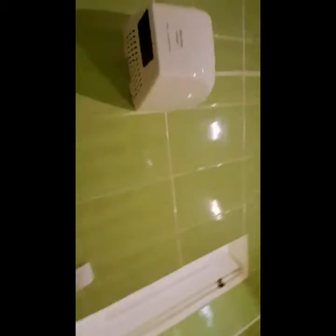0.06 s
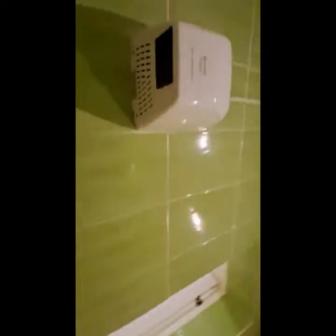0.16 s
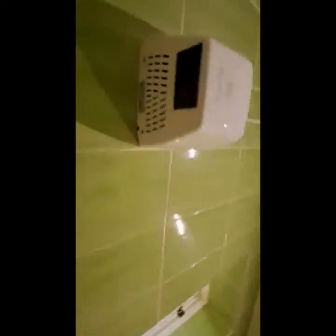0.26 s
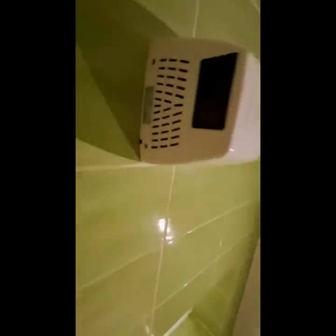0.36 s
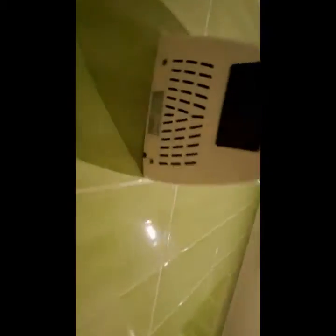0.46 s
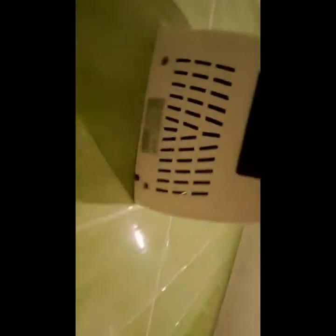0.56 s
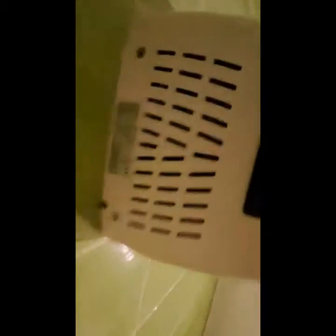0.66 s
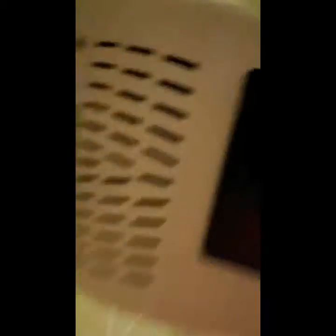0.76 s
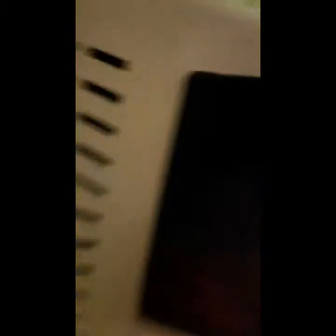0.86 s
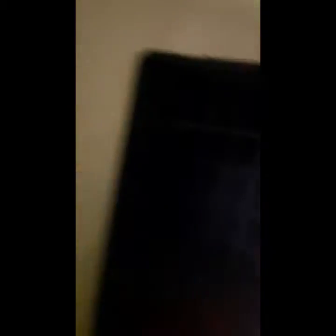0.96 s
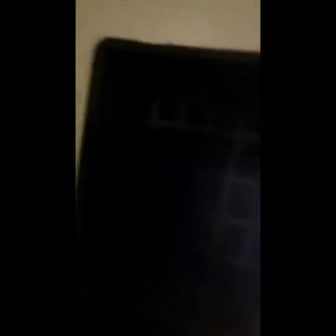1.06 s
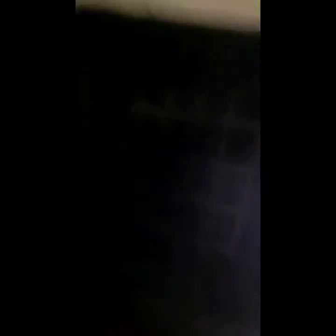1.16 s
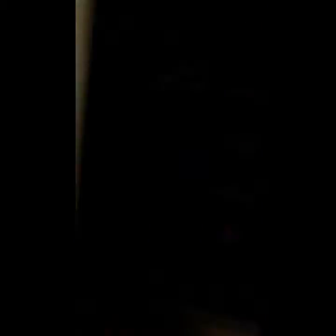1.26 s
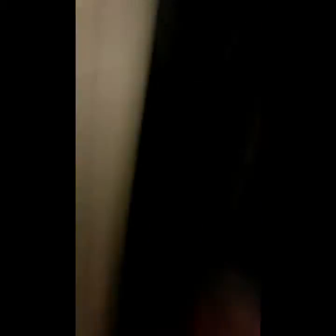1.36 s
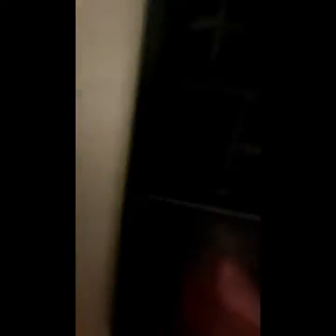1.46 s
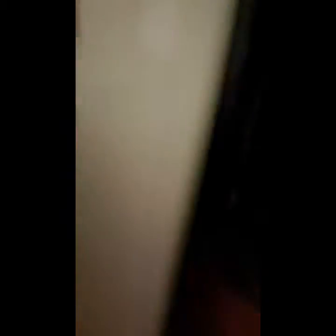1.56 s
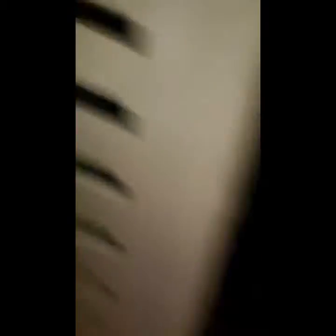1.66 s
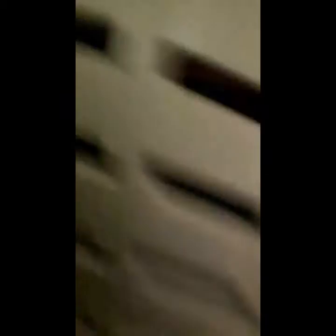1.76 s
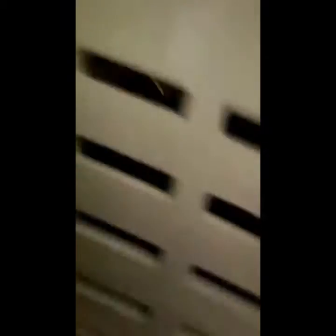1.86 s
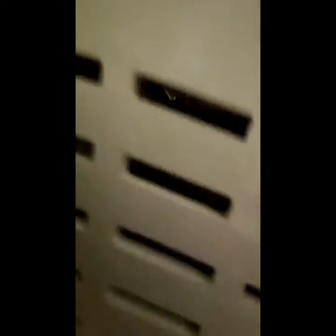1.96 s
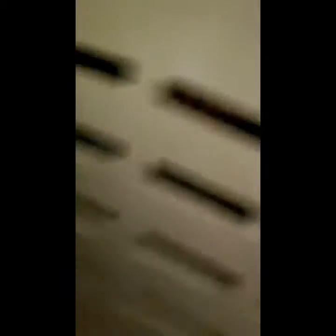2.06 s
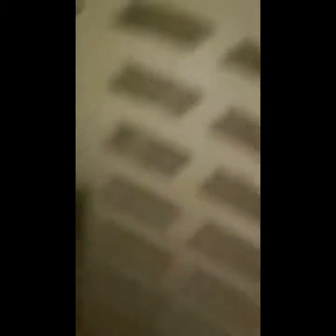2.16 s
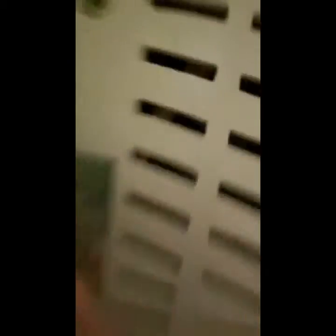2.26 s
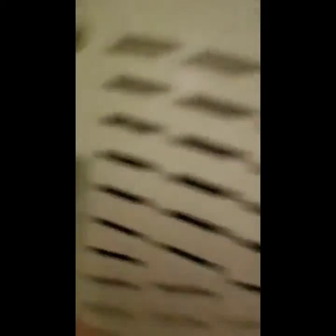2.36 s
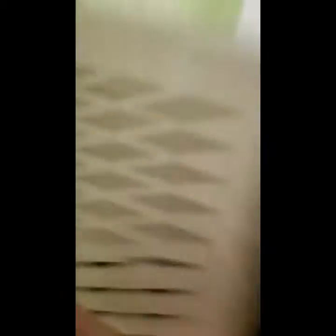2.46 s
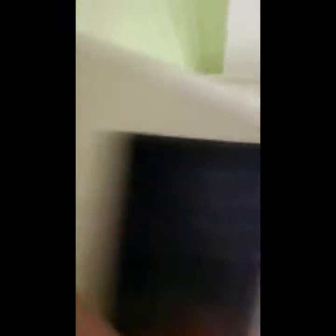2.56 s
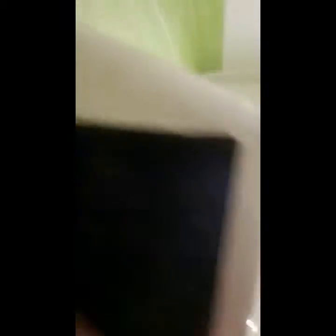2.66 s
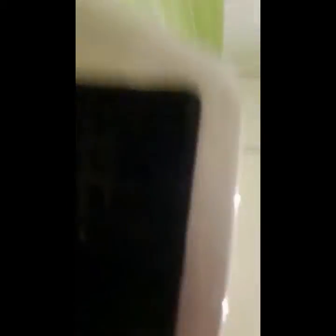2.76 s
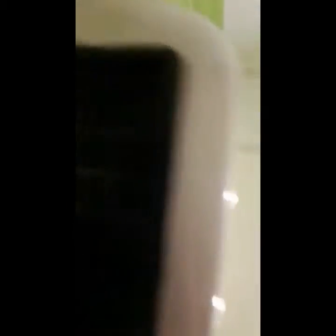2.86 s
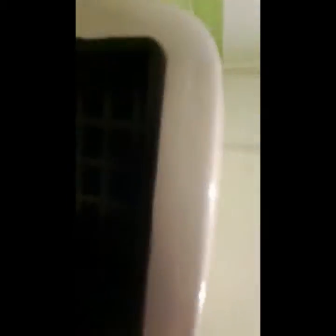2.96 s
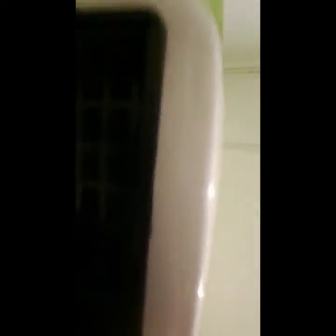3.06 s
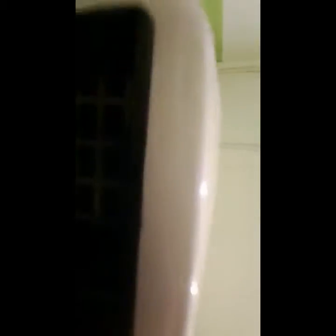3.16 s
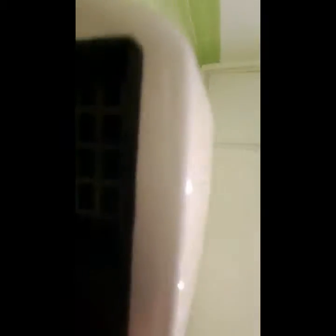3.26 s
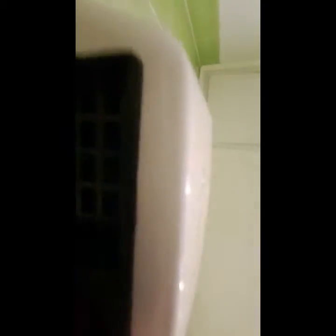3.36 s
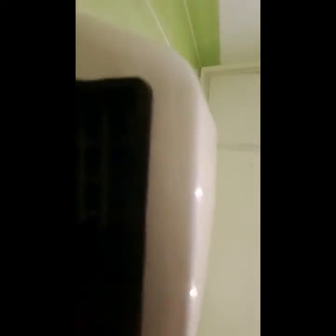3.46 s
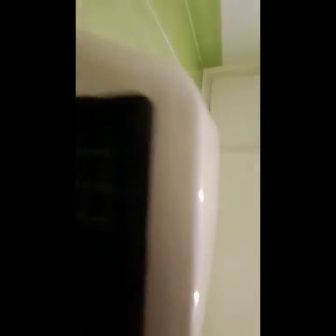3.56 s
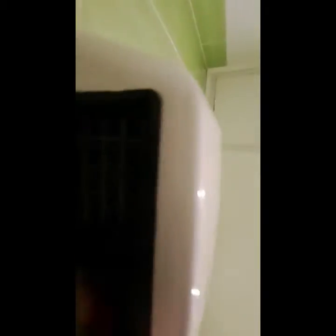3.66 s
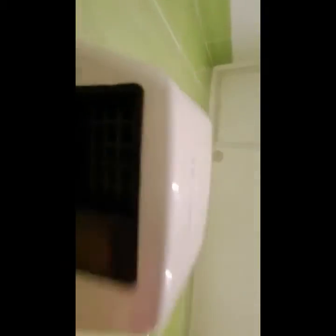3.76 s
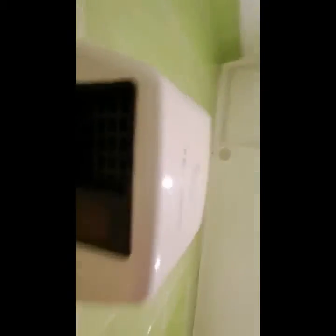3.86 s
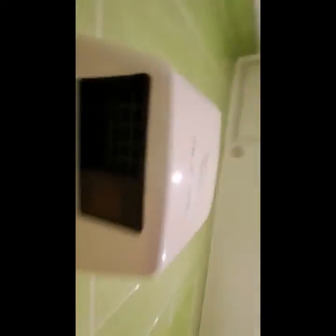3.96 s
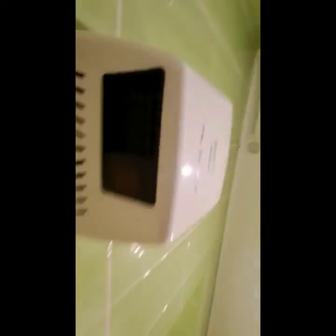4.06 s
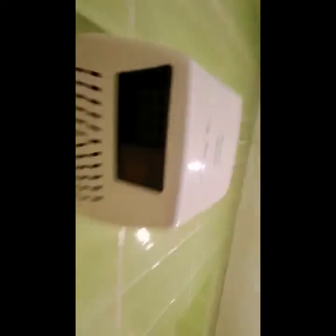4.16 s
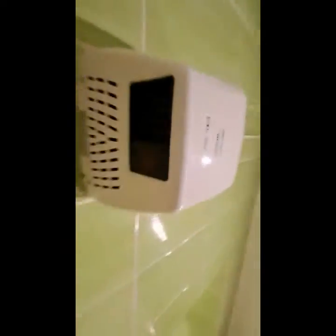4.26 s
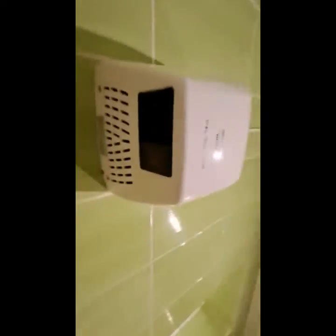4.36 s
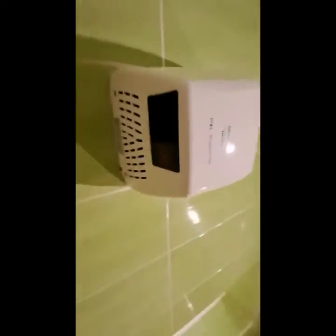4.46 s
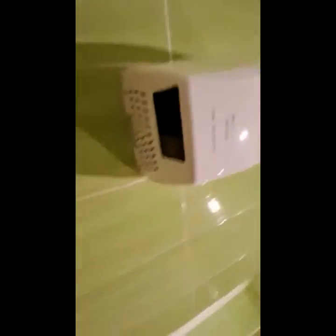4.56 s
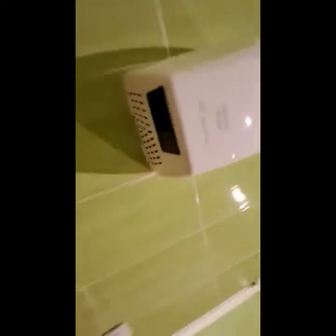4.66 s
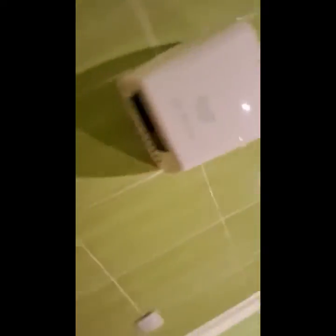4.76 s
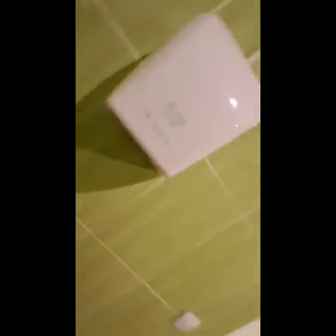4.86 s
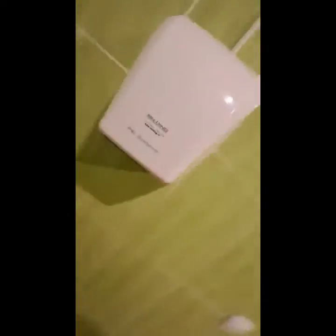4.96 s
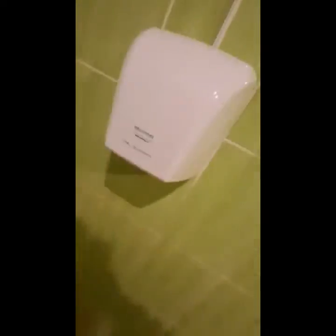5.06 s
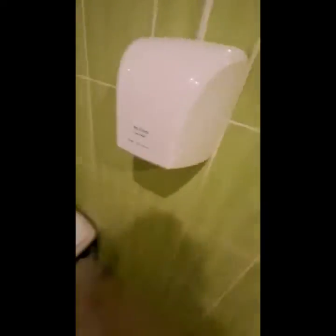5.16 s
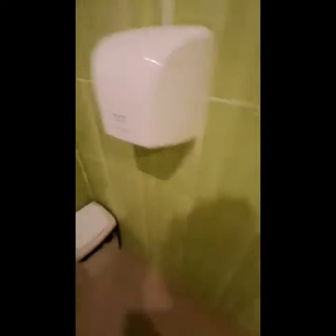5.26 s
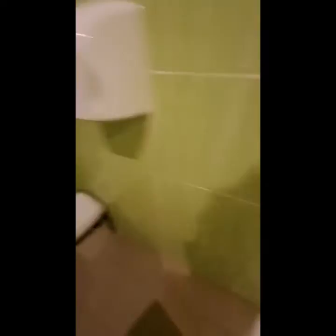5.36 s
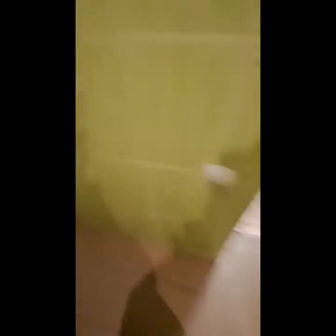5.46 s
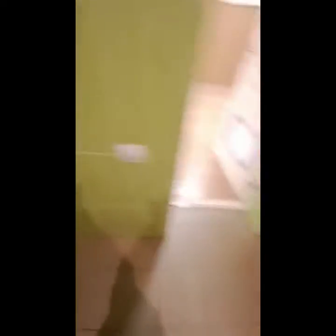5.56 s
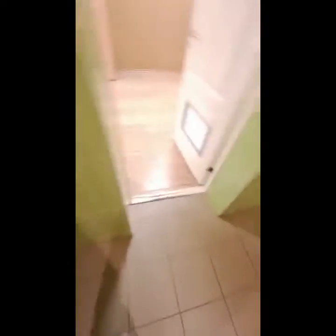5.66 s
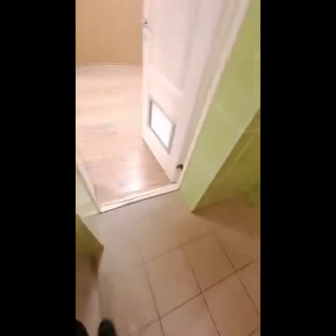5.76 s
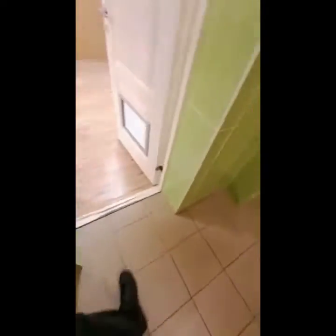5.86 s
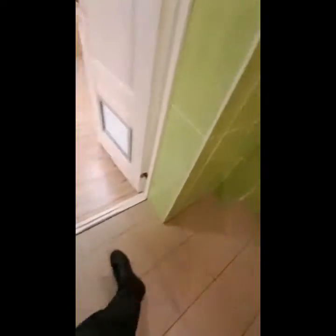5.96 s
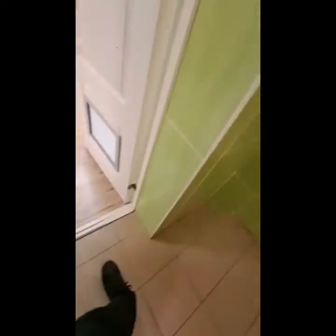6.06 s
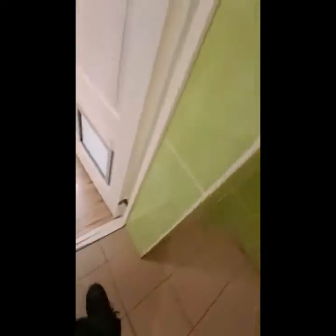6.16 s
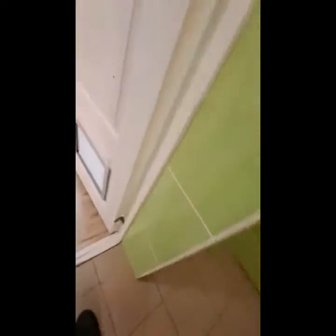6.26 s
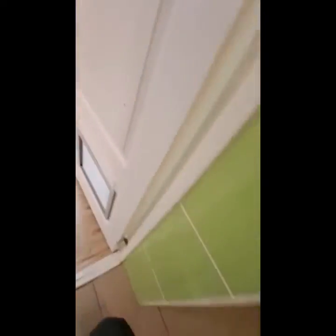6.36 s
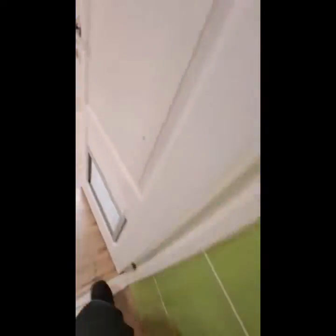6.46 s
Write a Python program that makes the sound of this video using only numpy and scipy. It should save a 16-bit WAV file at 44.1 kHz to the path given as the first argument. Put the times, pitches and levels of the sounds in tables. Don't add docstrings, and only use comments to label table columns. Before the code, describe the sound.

A close, handheld stereo microphone in a small, reverberant tiled washroom. From 0 s there is low room tone, clothing rustle and soft dull steps; at about 0.64 s a rubber sole squeaks roughly around 2.6 kHz, fading by 1 s. More muffled steps follow. Around 1.77-1.9 s a fingertip tap, heavy thuds and a firm knock hit the plastic housing; the hardest, bright knock comes at 2.24 s, a last tick at 2.42 s. Faint sole drags and a hollow heel thump at 3.16 s. At 3.49 s a relay snaps, the stalled motor buzzes at 100 Hz, and from 3.6 s air blasts and buffets the left side while the cover rattles until 3.85 s. The dryer then runs steadily: broad rushing air, low hum and a faint fluttering whine near 2.65 kHz. It dips around 5 s, swells around 5.5 s with light wind bumps, and recedes, still running, at 6.5 s.

```python
import sys
import numpy as np
from scipy import signal
from scipy.io import wavfile
from scipy.ndimage import uniform_filter1d

SR = 44100
rng = np.random.default_rng(int(sys.argv[2]) if len(sys.argv) > 2 else 0)


def bounce(signal):
    frames = np.transpose(np.atleast_2d(signal))
    limited = np.clip(frames, -1, 1)
    pcm = np.round(limited * 32767).astype(np.int16)
    wavfile.write(sys.argv[1], SR, pcm)


def voltage_ratio(decibels):
    exponent = np.asarray(decibels, float) / 20
    return 10 ** exponent


N = 287532
T = np.arange(N) / SR
START_S = 3.49


def evened(x):
    return x / np.sqrt(np.mean(x ** 2) + 1e-20)


def read(points, hz):
    f, value = np.transpose(points)
    return np.interp(np.log(hz + 1), np.log(f + 1), value)


def curves(rows, t=T):
    s, *columns = np.transpose(rows)
    return np.array([np.interp(t, s, c) for c in columns])


def add(mix, s, sound):
    part = mix[..., round(s * SR):][..., :sound.shape[-1]]
    part += sound[..., :part.shape[-1]]


def resonate(x, hz, width):
    return signal.lfilter(*signal.iirpeak(hz, hz / max(width, 2), SR), x)


def wander(width):
    smooth = uniform_filter1d(rng.standard_normal(N), int(width))
    return evened(uniform_filter1d(smooth, int(width)))


def swell(rows):
    return sum(voltage_ratio(db) * np.exp(-.5 * ((T - s) / length) ** 2) for s, db, length in rows)


def pan(db):
    return voltage_ratio(np.array([[.5], [-.5]]) * db)


def ports(x, pan_db=0, lag=14):
    return np.array([x, np.roll(x, lag)]) * pan(pan_db)


# low f/Hz, high f/Hz
BANDS = [(30, 200), (200, 1000), (1000, 5000), (5000, 15500)]


def layers(steady_db, bumps, narrow_db):
    centres = np.array([np.sqrt(lo * hi) for lo, hi in BANDS])[:, None]
    power = sum(voltage_ratio(2 * db) for db in steady_db)
    for s, db, length, hz in bumps:
        band_db = db - narrow_db * np.log2(centres / hz) ** 2
        power = power + voltage_ratio(2 * band_db) * np.exp(-((T - s) / length) ** 2)
    return 10 * np.log10(power)


# f/Hz, likeness/0-1
ALIKE = [(30, 0.7), (70, 1), (130, 0.98), (300, 0.89), (700, 0.98), (1500, 0.06), (4000, 0), (15000, 0)]
# f/Hz, width/Hz, level/dB
NOZZLE = [(712, 38, 14.5), (1190, 150, -6.5), (3490, 540, 8), (5000, 140, -5), (5960, 650, 6.5),
          (11300, 260, 5), (15000, 1300, -1)]
# f/Hz, level/dB
JET_SHIFT = [(60, -9), (150, 2.5), (280, -3), (600, 1), (1200, -1.7), (5000, 1), (12000, -1.7)]


def noise(spectrum, levels, patchy_db, flicker_db, jet=0, close=0, lag=14, size=1024):
    hop, hz = size // 4, np.fft.rfftfreq(size, 1 / SR)
    t = np.arange(N // hop + 5) * hop / SR
    a, b, c, d, patches = rng.standard_normal((len(t), len(hz), 5)).T
    patches = uniform_filter1d(patches, size=10, axis=0)
    patches = evened(uniform_filter1d(patches, size=12, axis=1))
    jet = np.clip(np.interp(t, T, jet * np.ones(N)), 0, 1)
    close = np.interp(t, T, close * np.ones(N))

    shape = read(spectrum, hz)
    own_db = []
    for lo, hi in BANDS:
        own_db.append(10 * np.log10(np.sum(voltage_ratio(2 * shape)[(hz > lo) & (hz <= hi)]) / len(hz)))
    lift = np.array([np.interp(t, T, db) for db in levels]) - np.array(own_db)[:, None]
    centres = np.log([np.sqrt(lo * hi) for lo, hi in BANDS])
    blend = np.array([np.interp(np.log(hz + 1), centres, row) for row in np.eye(len(BANDS))]).T
    field_db = shape[:, None] + blend @ lift + patchy_db * patches + flicker_db * rng.standard_normal(len(t))
    humps_db = sum(db * np.exp(-.5 * ((hz - f) / width) ** 2) for f, width, db in NOZZLE)
    field_db = field_db + np.outer(read(JET_SHIFT, hz), jet) + np.outer(humps_db, close)

    same = np.clip(read(ALIKE, hz)[:, None] * (1 - jet), 0, 1)
    left = a + 1j * b
    delayed = left * np.exp(-2j * np.pi * hz[:, None] * lag / SR)
    right = same * delayed + np.sqrt(1 - same ** 2) * (c + 1j * d)
    tilt_db = jet * np.interp(hz, [100, 260, 600, 3000, 9000], [-14.0, 11.5, 18.5, 10.0, 4.5])[:, None]
    z = np.array([left * voltage_ratio(0.33 * tilt_db), right * voltage_ratio(-.7 * tilt_db)]) * voltage_ratio(field_db)
    unit = np.std(signal.istft(left, nperseg=size, noverlap=size - hop)[1])
    return 1.091 * signal.istft(z, nperseg=size, noverlap=size - hop)[1][:, :N] / unit


# f/Hz, t60/s
TILES = [(120, 1.0), (330, .8), (900, .6), (2500, .72), (5200, .42), (10000, .3)]


def room(x, gap=120):
    taps = np.zeros((2, SR))
    at = np.arange(gap, SR - 40, 20) + rng.integers(0, 20, (2, 1))
    at = at + rng.integers(0, 20, at.shape)
    np.put_along_axis(taps, at, rng.choice([-1., 1.], at.shape), axis=1)
    hz, t, z = signal.stft(taps, SR, nperseg=256)
    bass = np.clip(read(ALIKE, hz), 0, 1)[:, None] ** 2
    z[1] = bass * z[0] + np.sqrt(1 - bass ** 2) * z[1]
    t60 = np.clip(read(TILES, hz), .15, 1.5)[:, None]
    tail = signal.istft(z * voltage_ratio(-60 * t / t60), SR, nperseg=256)[1]
    return signal.fftconvolve(x[None], tail / np.linalg.norm(tail[0]), axes=1)[:, :N]


# f/Hz, level per Hz/dB
QUIET = [(25, 10), (50, -1), (87, -2), (123, -20), (161, 1), (200, -3.5), (476, -3.5), (800, -15.5),
         (1500, -27.5), (2500, -34.5), (4500, -35), (8000, -39), (12500, -42), (16000, -43)]
# f/Hz, width/Hz, level/dB
BOOM = [
    (89.2, 17, -4.5),
    (159, 2.4, 2),
    (245, 6.6, -10),
    (344, 28, -16.5),
    (456, 15, -16),
]
TONE_DB = [-51.5, -66, -79, -74]
# t/s, level/dB
RUSTLE = [(0.0, -56.5), (0.13, -50), (0.27, -46.5), (0.56, -50.5), (0.72, -45.5), (0.98, -51), (1.23, -53),
          (1.45, -53.5), (1.71, -51), (1.81, -47), (1.95, -47), (2.15, -57.5), (2.28, -46.5), (2.45, -54),
          (2.6, -65.5), (2.78, -55.5), (3.28, -53.5), (3.5, -61)]
RUSTLE_DB = [-7, -10.5, -0.5, -8]
RUSTLE_FOLLOW = [1, 0.88, 0.93, 1.4]
RUSTLE_MID_DB = -50
# t/s, level/dB, length/s, centre f/Hz
SWAYS = [(0.195, -45.5, 0.092, 500), (.172, -47, .02, 1000), (.76, -50.5, 0.067, 500),
         (0.666, -51, 0.12, 450), (0.144, -45.5, 0.058, 90), (0.2, -59, 0.11, 8000), (0.54, -44, 0.11, 60),
         (0.834, -46, 0.037, 90), (1.21, -47, 0.063, 110), (1.25, -53, 0.057, 8000),
         (1.745, -37, 0.079, 50), (1.886, -45, 0.092, 110), (2.053, -44, 0.084, 404),
         (2.093, -68, 0.03, 6950), (2.304, -35, 0.066, 200), (2.397, -49, 0.14, 246),
         (2.733, -63.5, 0.029, 9100), (2.916, -60, 0.026, 8950), (3.298, -48, 0.072, 68),
         (3.497, -44, 0.026, 60)]


def stir():
    swing_db = np.c_[RUSTLE_FOLLOW] * (curves(RUSTLE) - RUSTLE_MID_DB)
    steady_db = [np.c_[TONE_DB], np.c_[RUSTLE_DB] + RUSTLE_MID_DB + swing_db]
    tone = noise(QUIET, layers(steady_db, SWAYS, narrow_db=2.5), patchy_db=.8, flicker_db=1.4)
    return 0.47 * tone + sum(2.46 * voltage_ratio(db) * resonate(tone, hz, width) for hz, width, db in BOOM)


# t/s, level/dB, length/s
WIND = [
    (1.72, -63, 0.096),
    (2.26, -37, 0.026),
    (3.601, -24.5, 0.037),
    (3.76, -36, 0.08),
    (3.924, -38.5, 0.083),
    (5.43, -44, 0.085),
    (5.55, -40.5, 0.11),
    (5.884, -45, 0.046),
    (6.285, -42, 0.07),
    (6.47, -35, 0.074),
]


def wind():
    lumps = resonate(resonate(rng.standard_normal((2, N)), 55, 65), 55, 110)
    return swell(WIND) * evened(lumps) * pan(-8)


# t/s, level/dB, length/s
DRAGS = [
    (2.79, -58, 0.034),
    (2.86, -61, 0.028),
    (2.97, -63, 0.017),
]


def drags():
    rub = resonate(resonate(rng.standard_normal((2, N)), 2150, 1900), 2150, 2800)
    return swell(DRAGS) * evened(rub)


# t/s, level/dB
THUMPS = [
    (3.025, -49),
    (3.157, -30.5),
]
# f/Hz, level/dB, t60/s
WALL_MODES = [(81, -4, 5.0), (156, -2.5, 1.3), (275, 0.5, 1.0), (343, -6, 0.86), (432, -6, 0.88),
              (660, -17.5, 0.52), (880, -14.5, 0.32)]


def thumps():
    out, t = np.zeros(N), np.arange(20000) / SR
    for (s, db), phase in zip(THUMPS, rng.random((len(THUMPS), len(WALL_MODES)))):
        ring = 0
        for (f, mode_db, t60), p in zip(WALL_MODES, phase):
            ring = ring + voltage_ratio(mode_db - 60 * t / np.clip(t60, .1, .45)) * np.sin(2 * np.pi * (f * t + p))
        ring *= 1 - np.exp(-t / 0.034)
        add(out, s, voltage_ratio(db) * ring / abs(ring).max())
    return ports(out, pan_db=1)


# t/s, thud level/dB, scrape level re thud/dB, thud f/Hz, length/s
STEPS = [(0.161, -34.5, -25, 503, 0.025), (0.606, -33.5, -9, 363, 0.038), (0.761, -44, -26, 430, 0.062),
         (1.154, -37, -42, 170, 0.027), (1.236, -40, -3, 283, 0.02), (1.404, -48, -18, 487, 0.081),
         (1.477, -40.5, -11, 170, 0.037), (1.772, -19.5, -20, 310, 0.017), (1.812, -22, -21, 270, 0.01),
         (2.037, -40, 4, 156, 0.062), (2.758, -59, -5, 153, 0.041), (2.882, -57, 6.5, 146, 0.11),
         (3.021, -41, -25, 159, 0.027), (3.159, -41, -40, 376, 0.063), (3.181, -34, -35, 245, 0.027),
         (3.226, -38, -18, 275, 0.032)]


def steps():
    out, t = np.zeros((2, N)), np.arange(12000) / SR
    for (s, db, scrape_db, hz, length), z in zip(STEPS, rng.standard_normal((len(STEPS), 2, 12000))):
        decay = np.exp(-t / np.clip(length, .005, .1)) + 0.33 * np.exp(-t / 0.0019)
        shape = (1 - np.exp(-t / 0.0049)) * decay
        thud = evened(resonate(resonate(z + 3.4 * z[0], hz, 170), hz, 420))
        thud += 0.19 * evened(resonate(resonate(z, 830, 700), 900, 900))
        scrape = evened(resonate(resonate(z, 1400, 4800), 2700, 12000))
        add(out, s, voltage_ratio(db) * shape * (thud + voltage_ratio(scrape_db) * scrape))
    return out


# t/s, level/dB, length/s
SLIPS = [
    (.6395, -26.5, .0026),
    (.6455, -29, .003),
    (.654, -29.5, .0035),
         (0.666, -40, 0.0027),
    (0.682, -36.5, 0.006),
    (0.709, -36.5, 0.0077),
    (.745, -39, 0.009),
    (0.773, -49, 0.011),
    (0.809, -46, 0.011),
    (0.859, -51, 0.0043),
    (0.932, -56.5, 0.011),
    (1.007, -58, 0.0067),
]
# t/s, f/Hz
SLIP = [(.635, 2640), (.65, 2560), (.66, 2520), (.69, 2620), (.715, 2520), (.745, 2600), (.78, 2540),
        (.81, 2620), (.86, 2560)]
# pitch ratio, level/dB
TREADS = [
    (1, 0),
    (1.07, -7),
    (1.17, -17),
    (.9, -19),
]


def squeak():
    turns = 2 * np.pi * np.cumsum(curves(SLIP)[0] * (1 + .03 * wander(22))) / SR
    level = swell(SLIPS)
    ribs = sum(voltage_ratio(db) * np.sin(ratio * turns) for ratio, db in TREADS)
    octave = (0.054 + 3.1 * level) * np.sin(2 * turns)
    return level * voltage_ratio(1.5 * wander(70)) * (ribs + octave)


def crack(z, modes, bright_db, rattle, rattle_s):
    t = np.arange(1000) / SR
    hit = np.pad(z * rattle * np.exp(-t[:400] / rattle_s), [(0, 0), (0, 600)]) + np.exp(-t / .00003)
    out = 0
    for k, (hz, width, db) in enumerate(modes):
        ring = evened(resonate(resonate(hit, hz, 1.62 * width), hz, 1.62 * width))
        mode_db = db + bright_db * np.clip(np.log2(hz / 2500), 0, 1.5)
        out = out + voltage_ratio(mode_db) * (-1) ** k * ring
    return out / abs(out).max()


# t/s, level/dB, brightness per octave/dB
SLAPS = [(.6045, -46, -14), (1.8935, -27, -1), (1.899, -33, -12), (2.039, -43, -4), (3.159, -47, -8),
         (3.526, -28, -2), (3.550, -20.5, -6), (3.5925, -13, -6), (3.606, -17, -7), (3.6635, -31, -6),
         (3.713, -24, 3.5), (3.617, -24, -3), (3.6854, -26, 6), (3.749, -29, 4), (3.8431, -23, -8)]
# f/Hz, width/Hz, level/dB
SHELL = [(1060, 118, 0), (1594, 280, -4), (2215, 300, -2), (3170, 510, -3.5), (4700, 660, -10.5),
         (5530, 250, -21.5), (7370, 860, -4.5), (10200, 1100, -11.5), (12700, 1900, -11)]


def slaps():
    out = np.zeros((2, N))
    for (s, db, bright_db), z in zip(SLAPS, rng.standard_normal((len(SLAPS), 2, 400))):
        add(out, s, 1.3 * voltage_ratio(db) * crack(z, SHELL, bright_db, rattle=0.32, rattle_s=0.0017))
    return out


# t/s, tick level/dB, ring re tick/dB, brightness per octave/dB, left-right/dB
KNOCKS = [
    (1.8877, -19.5, -4.5, -5.5, -5),
    (1.914, -30, -17.5, -17, 2),
    (2.206, -45.5, 7, 2, -4.5),
    (2.216, -35.5, -26, -4, -6),
    (2.2397, -11.5, -4.5, 2.5, -4.5),
    (2.25, -26, 6, -20, 6),
    (2.4166, -31.5, -3.5, -9.5, -4.5),
]
TAP = [
    (1.7706, -33, -8, -5, 2),
]
RELAY = [
    (3.4901, -19.5, -20, 0.0044, 6.5),
    (3.493, -20.5, -5.5, 0, 2),
]
# f/Hz, width/Hz, level/dB
PANEL = [(1070, 63, -11), (1670, 60, -4), (2110, 120, -1.5), (2750, 90, -10.5), (3800, 260, -10),
         (5100, 200, -16.5), (7900, 600, -14)]
# f/Hz, width/Hz, level/dB
CONTACT = [(1260, 75, -4), (2200, 330, -1), (3970, 430, -11.5), (5800, 610, -10), (7800, 850, -4),
           (9750, 400, -4), (12300, 600, -5), (14800, 900, -12)]
# f/Hz, level/dB, t60/s
FLANK = [(100, -6.5, 0.11), (245, 1, 0.11), (300, -7, .1), (356, -8, 0.18), (546, -11.5, 0.092),
         (660, -6.5, 0.14), (904, -18.5, .1), (1100, -12, .07)]
# f/Hz, level/dB, t60/s
HOUSING = [(160.5, -15.5, 0.24), (218.5, -8, 0.2), (261, -0.5, 0.16), (366.8, -4, 0.3), (420, -2.5, 0.07),
           (489, -3, 0.11), (569, -9, 0.21), (700, -8.5, 0.054)]


def knocks():
    out, t = np.zeros((2, N)), np.arange(12000) / SR
    rows = [(k, PANEL, .3, 0.0092) for k in TAP]  # blow, panels, rattle, rattle length in s
    rows += [(k, SHELL, .025, 0.0092) for k in KNOCKS]
    rows += [(k, CONTACT, .9, 0.0041) for k in RELAY]
    bloom = 1 + 1.1 * t / 0.029 * np.exp(1 - t / 0.029)
    chance = rng.standard_normal((len(rows), 2, 400 + len(HOUSING)))
    for ((s, db, ring_db, bright_db, pan_db), panels, rattle, rattle_s), z in zip(rows, chance):
        ring = 0
        for (f, mode_db, t60), u, v in zip(FLANK if s < 2 else HOUSING, *z[:, 400:]):
            twin = 0.82 * np.sin(2 * np.pi * f * 1.06 * t + 3 * v)
            decay = voltage_ratio(mode_db + 2.5 * u - 60 * t / np.clip(t60, .03, .3))
            ring = ring + decay * (np.sin(2 * np.pi * f * t) + twin)
        ring *= (1 - np.exp(-t / 0.00038)) * bloom
        sound = ports(voltage_ratio(ring_db + 3.0) * ring / abs(ring).max())
        add(sound, 0, 1.85 * crack(z[:, :400], panels, bright_db, rattle, rattle_s))
        add(out, s, sound * voltage_ratio(db) * pan(pan_db))
    return out


# t/s, level/dB, facing the nozzle/0-1
RUSH = [(3.49, -45, 1), (3.56, -32.5, 1), (3.62, -30.5, 1), (3.8, -27.5, 0.34), (4.0, -28.5, 0.77),
        (4.32, -30.5, 0.73), (4.91, -35.5, 0.55), (5.22, -34.5, 0.51), (5.43, -28.5, 0.6), (5.57, -28, 0.4),
        (5.82, -28, 0.16), (6.0, -29.5, 0.47), (6.24, -33, 0.38), (6.52, -35, 0.15)]
# t/s, turns f/Hz
SHAFT = [(3.49, 5), (3.6, 55), (3.7, 90), (3.8, 103), (3.9, 107), (4.1, 109.7), (4.2, 110.5), (4.4, 111),
         (6.52, 111.3)]
# multiple of the shaft, level/dB
ORDERS_DB = [
    (1, 0),
    (2, -8),
    (3, -14),
    (4, -41),
]
# t/s, shaft level/dB, mains level/dB, beating pair an octave up level/dB
HUM = [(3.9, -64, -52, -55), (4.1, -53.5, -67, -48), (4.3, -52, -59, -43.5), (4.6, -46, -63, -49.5),
       (4.9, -42.5, -71, -60), (5.2, -38.5, -68, -67), (5.45, -34.5, -65, -43), (5.6, -35, -57, -39),
       (5.8, -34.5, -47, -35.5), (6.0, -37, -46.5, -37.5), (6.2, -38, -44.5, -38), (6.52, -43, -44, -44)]
# multiple of 100 Hz, running level/dB, stalled level/dB
MAINS = [
    (1, 9.5, 8.5),
    (2, 0.5, 4),
    (3, -35, -1),
    (4, -18, -3),
    (5, -32, -14),
]
# t/s, level/dB, length/s
SPOTS = [(4.04, -3, 0.036), (4.12, 0.5, 0.081), (4.24, 1.5, 0.055), (4.4, 1, 0.077), (4.52, -9, .03),
         (4.65, -3.5, 0.091), (4.8, 4, 0.04), (4.885, 2, 0.009), (5.0, 5, 0.0088), (5.1, 5, 0.0063),
         (5.18, 6, 0.032), (5.27, -4, 0.019), (5.34, 0, .022), (5.45, 3, 0.011), (5.525, 8.5, 0.011),
         (5.6, -9, 0.013), (5.69, 4, 0.014), (5.78, 11, 0.023), (5.86, -11, .015), (5.95, 1, 0.026),
         (6.03, -1, 0.043), (6.15, 11.5, 0.0056), (6.21, 4, 0.0057), (6.33, -6, 0.032), (6.42, 2, 0.028)]


def motor():
    blade_count = 24
    shaft_db, mains_db, pair_db = curves(HUM)
    turns = 2 * np.pi * np.cumsum(curves(SHAFT)[0] * (1 + .0012 * wander(2500))) / SR
    cycles = 2 * np.pi * 100 * T
    shaft = sum(voltage_ratio(db + 0.25 * wander(1200)) * np.sin(k * turns + k) for k, db in ORDERS_DB)

    since = np.maximum(T - START_S, 0)
    release = 1 + np.exp(np.minimum((since - 0.1) / 0.016, 50))
    inrush = np.minimum(since / 0.059, 1) / release
    mains = 0
    for k, db, stall_db in MAINS:
        level = voltage_ratio(mains_db + db) + voltage_ratio(-26.5 + stall_db) * inrush
        mains = mains + level * voltage_ratio(1.6 * wander(920)) * np.cos(k * cycles + 0.87 * k * k)
    pair = voltage_ratio(pair_db) * (np.cos(2 * cycles) + 0.78 * np.cos(cycles + turns + 1.9))

    echo = voltage_ratio(-21.5) + swell(SPOTS)
    blade_level = echo * voltage_ratio(curves(RUSH)[0] - 6.5 + 1.7 * wander(430))
    blades = blade_level * np.sin(blade_count * turns + .65 * wander(610))
    blades = blades * np.clip((T - 3.93) / .13, 0, 1)
    hum = ports(voltage_ratio(shaft_db) * shaft, pan_db=1.5, lag=21) + ports(mains + pair, lag=16)
    return np.sqrt(2) * (hum + ports(blades))


# f/Hz, level per Hz/dB
AIR = [(25, -56), (60, -52), (140, -25.5), (300, -5), (520, -8.5), (820, -6.5), (1250, -8), (2000, -9.5),
       (2600, -12), (4600, -20), (6000, -23), (8500, -25), (12000, -24.5), (16000, -33)]
# t/s, share/0-1
JET = [
    (3.5, 0),
    (3.57, 0.04),
    (3.61, 1),
    (3.68, 1),
    (3.8, 1),
    (3.85, 0.59),
    (3.97, 0.19),
    (4.5, 0),
]
# t/s, closeness/0-1
CLOSE = [(3.8, 0.09), (4.05, 0.53), (4.5, 0.55), (5.0, 0.27), (5.4, 0.02), (6.0, 0.13), (6.5, 0.05)]
AWAY_DB = [-21.5, 2, 1, -8]
FACING_DB = [12.5, -15, -2, 1]
# t/s, level/dB, length/s, centre f/Hz
GUSTS = [(3.496, -19.5, 0.0082, 6660), (3.516, -13.5, 0.021, 258), (3.556, -32, 0.011, 395),
         (3.589, -11, 0.01, 438), (3.614, -10.5, 0.0085, 770), (3.637, -16.5, 0.017, 610),
         (3.679, -12.5, 0.0094, 650), (3.505, -20, .006, 300), (3.695, -15, 0.0069, 650),
         (3.714, -15, 0.022, 590), (3.61, -33.5, 0.0093, 4500), (3.74, -33, 0.04, 4500),
         (3.804, -21, 0.0059, 604), (4.007, -39, 0.15, 11200), (5.8, -36, 0.21, 11000),
         (3.752, -15.5, 0.023, 1030), (3.817, -27, 0.014, 700), (3.88, -44, 0.03, 596),
         (5.603, -25.5, 0.012, 700), (5.706, -24.5, 0.034, 603), (5.79, -41, 0.019, 700),
         (5.884, -23, 0.017, 800), (5.936, -22.5, 0.012, 590), (6.08, -28.5, 0.034, 700),
         (6.184, -27, 0.026, 700)]
# f/Hz, width/Hz, level under the jet/dB, level when turned away/dB
DUCT = [
    (507, 430, -5, -24),
    (830, 160, -30, 3),
    (375, 21, -14, 1),
    (2630, 110, -30, -3),
]


def dryer():
    jet = curves(JET)[0]
    rush_db, facing = curves(RUSH)
    levels = layers([rush_db + np.c_[AWAY_DB] + np.c_[FACING_DB] * facing], GUSTS, narrow_db=3.0)
    air = noise(AIR, levels, patchy_db=1.4, flicker_db=.7, jet=jet, close=curves(CLOSE)[0])
    lumps = wander(180)
    air[0] *= voltage_ratio(3.26 * jet * lumps)
    away = np.clip(1 - facing, 0, 1)
    cavities = 0
    for hz, width, jet_db, away_db in DUCT:
        level = voltage_ratio(jet_db) * jet + voltage_ratio(away_db) * away
        cavities = cavities + level * voltage_ratio(3 * lumps) * resonate(air, hz, width)
    on = np.clip((T - START_S) / 0.044, 0, 1)
    air = on * (air + cavities)
    return voltage_ratio(-2.5) * air + voltage_ratio(-5.5) * room(air[1]) + on * motor()


def scene():
    near, floor, sole = knocks(), steps(), squeak()
    sent = voltage_ratio(-22.5) * resonate(near.mean(0), 980, 3000) + voltage_ratio(-12) * floor.mean(0) + voltage_ratio(-10.0) * sole
    feet = voltage_ratio(-5.0) * floor + ports(sole, lag=-1) + drags() + thumps()
    return stir() + wind() + feet + near + slaps() + room(sent) + dryer()


def roll_off(x):
    return signal.sosfilt(signal.butter(12, 17040, fs=SR, output="sos"), x)


def record(dry):
    cut = signal.lfilter(*signal.butter(2, 45 / (SR / 2), "high"), dry)
    cut = cut * np.minimum(T / 0.14 + 0.69, 1)
    soft = np.tanh(cut / 1.098) * 1.054
    lowpass = signal.firwin(801, 16000, window=("kaiser", 9), fs=SR)
    mix = signal.oaconvolve(soft, lowpass[None], "same")
    return roll_off(mix)


dry = scene()
out = record(dry)
bounce(out)
```